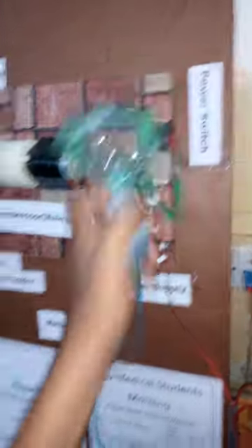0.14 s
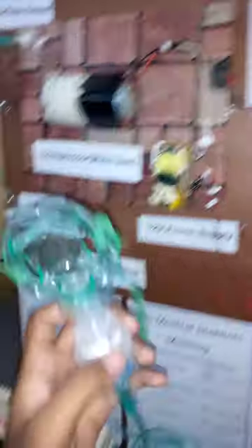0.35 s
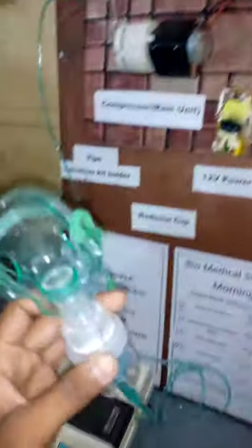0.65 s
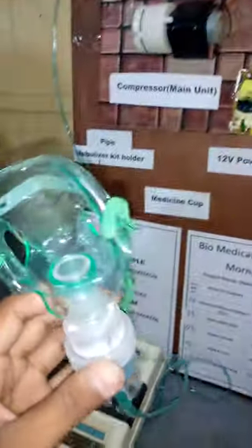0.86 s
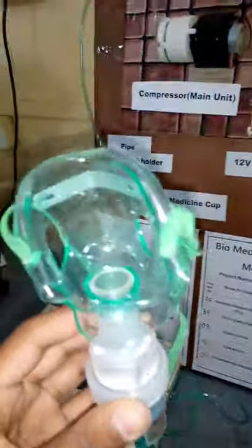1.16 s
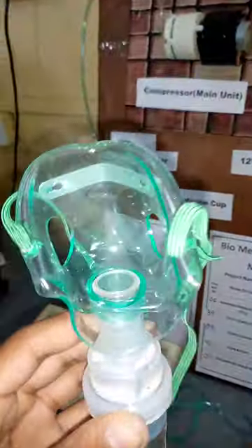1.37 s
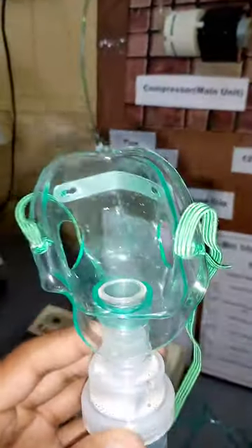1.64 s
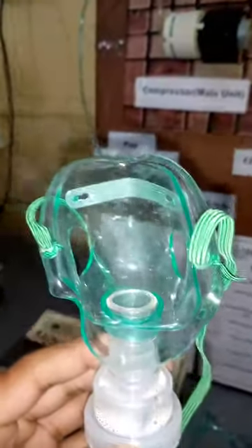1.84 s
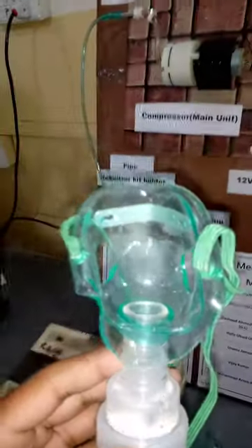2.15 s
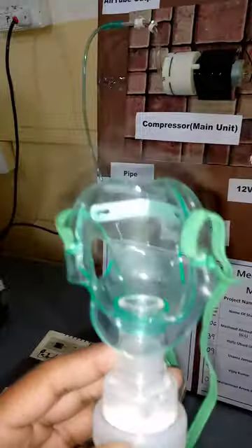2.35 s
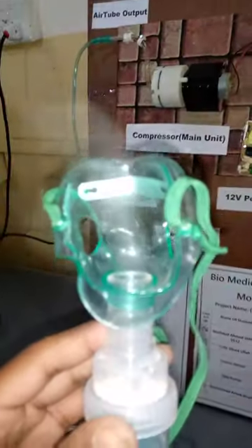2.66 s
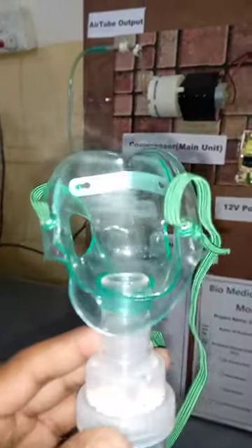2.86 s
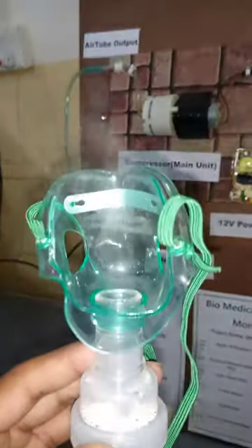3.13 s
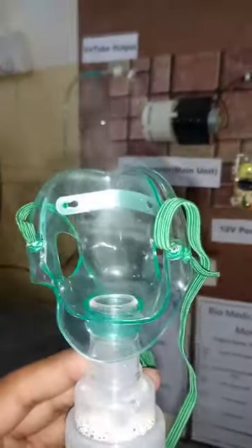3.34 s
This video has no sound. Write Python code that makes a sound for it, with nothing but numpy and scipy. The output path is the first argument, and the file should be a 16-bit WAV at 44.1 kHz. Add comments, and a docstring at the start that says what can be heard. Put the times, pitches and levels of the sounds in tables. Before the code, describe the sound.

A small compressor motor buzzes low with rushing air while a handheld nebuliser jet hisses and fizzes up close; crackling liquid bursts crowd the first second, then thin out in a small, dry room.

```python
"""A medical nebuliser hisses as its mask is brought close to the microphone, driven by a diaphragm compressor.
The jet is noise through the resonances of the cup, under a high whistle and a fizz of droplets. Each slug of
liquid pulls a noise band down in a short squelch, often while the cup is swung about and seldom once it is
held still; spits chirp upward. The motor picks up speed: sines hum on its multiples over a rush of air."""
import sys
import numpy as np
from scipy import signal
from scipy.fft import rfft, irfft
from scipy.io import wavfile
from scipy.ndimage import map_coordinates

SR = 44100
rng = np.random.default_rng(int(sys.argv[2]) if len(sys.argv) > 2 else 0)


def waveform_to_disk(signal):
    """Save audio, clipped to [-1, 1], as 16-bit WAV at the path in sys.argv[1]."""
    frames = np.transpose(np.atleast_2d(signal))
    scaled = np.clip(frames, -1, 1) * 32767
    samples = np.round(scaled).astype(np.int16)
    wavfile.write(sys.argv[1], SR, samples)


N = 154350
T = np.arange(N) / SR


def from_db(db):
    """Decibels to amplitude gain."""
    return 10 ** (np.asarray(db) / 20)


def rms_one(x):
    """Scale to rms 1."""
    return x / np.sqrt(np.mean(x ** 2) + 1e-20)


def in_time(rows):
    """Each column of a curve, sample by sample."""
    t, *columns = np.transpose(rows)
    return [np.interp(T, t, column) for column in columns]


def drift(rate_hz):
    """Smooth random movement of rms 1: noise low-passed by two equal poles at rate_hz."""
    step = 20  # samples between computed points
    pole = np.exp(-2 * np.pi * rate_hz * step / SR)
    noise = rng.standard_normal(N // step + 2002)
    slow = signal.lfilter([1], [1, -2 * pole, pole * pole], noise)[2000:]  # drop the settling time
    return np.interp(np.arange(N) / step, np.arange(len(slow)), rms_one(slow))


def coloured_noise(spectrum):
    """Noise of rms 1, shaped by a spectrum drawn over log frequency."""
    hz, db = np.transpose(spectrum)
    bins_hz = np.fft.rfftfreq(N, 1 / SR)
    gain = from_db(np.interp(np.log(bins_hz + 1), np.log(hz), db))
    return rms_one(irfft(rfft(rng.standard_normal(N)) * gain, N))


def resonate(x, hz, width_hz):
    """One two-pole resonance, gain about 1 at its peak."""
    r = np.exp(-np.pi * width_hz / SR)
    zeros = np.array([1, 0, -1]) * (1 - r * r) / 2
    poles = [1, -2 * r * np.cos(2 * np.pi * hz / SR), r * r]
    return signal.lfilter(zeros, poles, x + 1e-18)


def noise_band(hz, width_hz):
    """Noise passed twice through a resonance, for steep skirts."""
    once = resonate(rng.standard_normal(N), hz, width_hz)
    return resonate(once, hz, width_hz)


def gliding_noise(hz, width_hz, evenness=0):
    """A narrow noise band carried on a moving pitch, rms 1; evenness 1 holds its envelope steady."""
    lowpass = signal.butter(2, width_hz / 2, fs=SR, output="sos")
    i, q = signal.sosfilt(lowpass, rng.standard_normal((2, N)))
    phase = 2 * np.pi * np.cumsum(hz) / SR
    band = i * np.cos(phase) + q * np.sin(phase)
    return rms_one(band / np.hypot(i, q) ** np.clip(evenness, 0, 1))


# speed of the motor: t/s, f/Hz (turns per second)
MOTOR_SPEED = [(0.0, 33.5), (0.09, 33.6), (0.27, 35.0), (0.48, 35.9), (0.78, 36.4), (0.98, 36.4),
               (1.57, 36.9), (1.92, 37.1), (2.26, 36.9), (2.88, 37.0), (3.14, 36.5), (3.5, 36.7)]


def shaft_angle():
    """The turning shaft's angle in radians, its speed summed over time."""
    speed_hz, = in_time(MOTOR_SPEED)
    return 2 * np.pi * np.cumsum(speed_hz) / SR


# pump hum lines: multiple of the shaft speed, then mean level/dB at each of four listening places
HUM_LINES = [(5, -56, -61.5, -62, -65), (8, -57, -68, -63, -62), (9, -73, -65.5, -60, -60),
             (10, -56, -62, -69, -77), (11, -74, -78, -69.5, -67), (15, -62, -64, -57, -59.5),
             (16, -59, -70, -61.5, -66), (18, -86, -72, -59.5, -59.5), (20, -53, -65, -89, -74),
             (21, -57, -65.5, -77, -71), (22, -65, -60.5, -66, -64), (25, -62, -64, -66, -62),
             (26, -79, -69, -65, -64)]
# strongest hum line: t/s, mean level/dB
MAIN_HUM_LEVEL = [(0, -56), (.2, -54.5), (.45, -50.5), (1.3, -52), (1.9, -54.5), (2.95, -54.5),
                  (3.15, -50.5), (3.5, -52)]
# where the microphone is, between those places: t/s, place (0-3)
MICROPHONE_PLACE = [(0.1, 0), (.5, 1), (.85, 1.05), (1.4, 2), (2.88, 2), (3.1, 3)]


def pump_hum(angle):
    """Sines locked to multiples of the shaft speed, each wavering slightly in level."""
    main_order, waver_db, waver_hz = 6, 0.2, 2.2
    place, = in_time(MICROPHONE_PLACE)
    lines = [(main_order, in_time(MAIN_HUM_LEVEL)[0])]
    for order, *place_db in HUM_LINES:
        lines.append((round(order), np.interp(place, np.arange(len(place_db)), place_db)))
    hum = np.zeros(N)
    for order, db in lines:
        gain = from_db(db + waver_db * drift(waver_hz))
        hum += gain * np.sin(order * angle + 2 * np.pi * rng.random())
    return np.sqrt(2) * hum  # line levels are rms


# colour of the rush of pump and air: f/Hz, relative level/dB (per Hz)
RUSH_SPECTRUM = [(25, -35), (36, -38), (47, -7.5), (60, -28), (80, 2), (105, -7), (150, -1), (205, -2),
                 (250, -6.5), (310, -1), (450, -3.5), (700, -6.5), (1000, -9.5), (1300, -8.5), (2050, -17),
                 (2500, -11.5), (3050, -7.5), (3500, -14.5), (4300, -19), (6000, -12.5), (16000, -33.5)]


def air_rush(angle):
    """Coloured noise that swells a little on each stroke, once per turn of the shaft."""
    level_db, stroke_depth = -45.5, 0.061
    stroke = 1 + stroke_depth * np.sin(angle)
    return from_db(level_db) * coloured_noise(RUSH_SPECTRUM) * stroke


def compressor():
    """One shaft drives both the pump's hum lines and the pulsing rush of air."""
    angle = shaft_angle()
    return pump_hum(angle) + air_rush(angle)


# resonances of cup and mask: f/Hz, width/Hz (of one pass), relative level/dB (gain at the peak)
CUP_RESONANCES = [(3415, 760, -14.5), (5284, 273, 1.5), (5825, 224, 2), (6580, 730, -8), (7600, 710, -6.5),
                  (8600, 920, -15), (10100, 705, -7)]


def cup_hiss(slide):
    """Noise in the cup's resonances, read at a varying speed so that its colour slides; rms 1."""
    hiss = sum(from_db(db) * noise_band(hz, width) for hz, width, db in CUP_RESONANCES)
    return rms_one(map_coordinates(hiss, [np.cumsum(slide)], order=5, mode="mirror"))


def in_cup(x):
    """Part of a sound rings in the cup, the rest escapes directly."""
    share = 0.84
    rung = sum(from_db(db) * resonate(x, hz, width) for hz, width, db in CUP_RESONANCES)
    return (1 - share) * x + share * rung


# the hiss changes colour a little as the mask is turned: t/s, frequency ratio
COLOUR_SLIDE = [(0, .988), (.3, .995), (.6, 1), (1.2, 1.01), (1.8, 1.005), (2.3, .998), (3.5, .99)]


def colour_slide():
    """Frequency ratio of the hiss and whistle, with a small random wander."""
    wander, wander_hz = 0.003, 4
    return in_time(COLOUR_SLIDE)[0] + wander * drift(wander_hz)


def top_whistle(slide):
    """A narrow noise band high above the hiss, its pitch wandering and its level fluttering."""
    centre_hz, width_hz = 14850, 900
    wander_hz, wander_rate_hz = 170, 25
    flutter_db, flutter_hz = 1.8, 38
    pitch_hz = centre_hz * slide + wander_hz * drift(wander_rate_hz)
    return gliding_noise(pitch_hz, width_hz) * from_db(flutter_db * drift(flutter_hz))


def droplets():
    """Tiny drops of uneven size burst at random, each ringing briefly at one of 20 pitches; rms 1."""
    drops_per_s, spread_db, low_hz, high_hz = 1400, 3.5, 5100, 10600
    sizes = from_db(spread_db * np.minimum(rng.exponential(1, N), 4)) * rng.choice([-1, 1], N)
    clicks = sizes * (rng.random(N) < drops_per_s / SR)
    pitches_hz = np.geomspace(low_hz, high_hz, 20)
    dealt = rng.integers(0, len(pitches_hz), N)  # which pitch each drop gets
    ringing = np.zeros(N)
    for k, hz in enumerate(pitches_hz):
        ring = resonate(clicks * (dealt == k), hz, hz / 15)
        ringing += resonate(ring, hz, hz / 4)  # softens the onset
    return rms_one(ringing)


# slugs of liquid pass the jet:
# loudest moment t/s, rise t/s, fall t/s, pitch it falls toward f/Hz, level/dB before the cup
LIQUID_SLUGS = [(0.062, 0.0071, 0.0086, 5600, -32.5), (.145, .04, 0.068, 10000, -39.5),
                (0.234, 0.022, .014, 6910, -28), (.264, .009, 0.0048, 5500, -29),
                (0.277, 0.0085, .006, 3200, -42), (.325, 0.0057, 0.0076, 5950, -25.5),
                (0.354, 0.01, 0.017, 5430, -27), (0.384, .006, .014, 5400, -30),
                (0.414, 0.0078, 0.012, 5400, -29), (.488, .013, .008, 7600, -24.5),
                (.502, .006, 0.018, 6910, -28.5), (0.527, 0.0064, .013, 5900, -23.5),
                (0.588, 0.0045, 0.012, 8000, -24.5), (0.619, 0.0098, 0.023, 5450, -24.5),
                (0.731, 0.0067, .014, 5120, -25.5), (0.783, 0.0071, 0.0068, 7000, -25.5),
                (.820, 0.007, 0.0083, 6700, -24.5), (1.024, 0.0044, 0.0059, 8600, -27),
                (1.054, 0.0063, 0.023, 4730, -29), (1.185, 0.013, 0.021, 4890, -27.5),
                (1.275, .01, 0.0099, 5310, -28), (1.323, 0.01234, 0.0098, 6300, -24.5),
                (1.435, 0.0067, .01, 9830, -27.5), (1.468, 0.017, .012, 5310, -27),
                (1.623, .003, .013, 5100, -25), (1.667, 0.012, 0.013, 5280, -26.5),
                (1.766, 0.014, 0.027, 5440, -27.5), (2.155, 0.0131, 0.012, 6030, -27),
                (2.2, 0.012, 0.0058, 6570, -26.5), (2.648, .013, 0.0097, 6420, -30.5),
                (2.901, .012, .009, 9280, -33), (2.917, .007, 0.0051, 6430, -31),
                (3.05, .015, 0.014, 6020, -32.5)]


def squelches():
    """Slugs sweep a rough noise band downward; also returns their gain and the jet's choking (0-1)."""
    top_hz, fall_rate = 11570, 3.8  # fall_rate: time constants per slug
    swell_db, fade_db = 13, 13
    wobble_hz, wobble_rate_hz, rough_db, rough_hz = 330, 170, 2, 220
    pitch_hz, gain, choked = np.full(N, float(top_hz)), np.zeros(N), np.zeros(N)
    for peak, rise, fall, low_hz, db in LIQUID_SLUGS:
        span = (T > peak - rise) & (T < peak + fall)
        t = T[span] - peak
        progress = (t + rise) / (rise + fall)
        fill = np.minimum(4 * np.sin(np.pi * progress), 1)  # soft edges
        pitch_hz[span] = low_hz + (top_hz - low_hz) * np.exp(-fall_rate * progress)
        contour_db = np.minimum(swell_db * t / rise, -fade_db * t / fall)
        gain[span] += fill * from_db(db + contour_db)
        choked[span] = np.maximum(choked[span], fill)
    wobbling_hz = pitch_hz + wobble_hz * drift(wobble_rate_hz)
    sweep = gliding_noise(wobbling_hz, width_hz=1250, evenness=0.45)
    rough = from_db(rough_db * drift(rough_hz))
    window = np.hanning(int(0.004 * SR) + 3)  # about 4 ms of smoothing
    choked = signal.fftconvolve(choked, window / window.sum(), "same")
    return in_cup(sweep * gain * rough), gain, choked


# the jet clears with a spit: loudest moment t/s, pitch at that moment f/Hz, level/dB
JET_SPITS = [(0.286, 5186, -31), (0.371, 7600, -37), (.403, 7400, -30), (0.424, 7000, -38),
             (.561, 7700, -35), (.640, 6600, -35), (0.779, 7800, -35), (1.077, 6500, -32),
             (1.207, 7000, -37), (1.288, 7000, -34), (1.483, 9000, -33), (1.599, 5700, -33.5),
             (1.637, 5600, -30), (1.681, 7000, -32.5)]


def spits():
    """The jet clears with a sharp chirp whose pitch shoots up and levels off."""
    attack_s, decay_s, rise_hz_per_s = 0.0016, 0.0035, 170000
    pitch_hz, gain = np.zeros(N), np.zeros(N)
    for peak, hz, db in JET_SPITS:
        span = (T > peak - 3 * attack_s) & (T < peak + 4 * decay_s)
        t = T[span] - peak
        pitch_hz[span] = hz + rise_hz_per_s * decay_s * np.tanh(t / decay_s)
        fade = np.where(t < 0, (t / attack_s) ** 2, t / decay_s)
        gain[span] = from_db(db) * np.exp(-fade)
    return gain * gliding_noise(pitch_hz, width_hz=450, evenness=0.9)


# the mouth of the mask rings while it faces the microphone: t/s, boost level/dB
MASK_FACING = [(0, 1.5), (.33, 4.5), (.48, 11.5), (.62, 11.5), (.8, 11), (.95, 2), (3.5, 6)]


def mask_mouth(jet):
    """A resonance of the mask's mouth, added to the jet by as much as the mask faces the microphone."""
    boost = from_db(in_time(MASK_FACING)[0]) - 1
    return jet + boost * resonate(jet, 7560, width_hz=520)


# the jet before choking and the mask's ring: t/s, hiss level/dB, top whistle level/dB
JET_LEVELS = [(0, -44, -66), (.08, -45, -62), (.13, -41.5, -37), (.22, -40, -49), (.3, -40.5, -42),
              (.45, -36.5, -43.5), (.62, -36.5, -41.5), (.85, -38.5, -41.5), (1.15, -38, -41.5),
              (1.6, -38, -43.5), (1.95, -40.5, -46.5), (2.2, -39.5, -47.5), (2.5, -44.5, -49.5),
              (3.1, -44.5, -52.5), (3.5, -44, -49)]


def nebuliser():
    """Fluttering hiss and whistle give way to each slug, among spits and droplets, all through the mask."""
    flutter_db, flutter_hz = 1.5, 7
    hiss_duck, whistle_duck = 0.42, 0.66  # share lost when fully choked
    spray_db, fizz_db = -8, -11  # droplets relative to slugs and to hiss
    hiss_db, whistle_db = in_time(JET_LEVELS)
    slugs, slug_gain, choked = squelches()
    slide = colour_slide()
    flow = from_db(hiss_db + flutter_db * drift(flutter_hz)) * (1 - hiss_duck * choked)
    hiss = flow * cup_hiss(slide)
    whistle = top_whistle(slide) * from_db(whistle_db) * (1 - whistle_duck * choked)
    spray = droplets() * (from_db(spray_db) * slug_gain + from_db(fizz_db) * flow)
    return mask_mouth(hiss + whistle + in_cup(spray) + slugs + spits())


def room(x):
    """A reflection off the board, its path swaying with the hand, then the short tail of a small room."""
    delay_s, sway_s, sway_hz, board_db = 0.0037, 0.00004, 0.4, -15
    t60_s, tail_db = 0.05, -7
    delay = delay_s + sway_s * drift(sway_hz)
    x = x + from_db(board_db) * map_coordinates(x, [(T - delay) * SR], order=5)
    tail = rng.standard_normal(SR // 2) * from_db(-60 * T[:SR // 2] / t60_s)
    tail /= np.linalg.norm(tail)
    return x + from_db(tail_db) * signal.fftconvolve(x, tail)[:N]


def scene():
    """Dry compressor and nebuliser in its room, the same in both channels."""
    mono = compressor() + room(nebuliser())
    return np.array([mono, mono])


def record(dry):
    """A steep elliptic low-pass cuts the top."""
    cutoff_hz = 15780
    lowpass = signal.ellip(12, 0.1, 80, cutoff_hz, fs=SR, output="sos")
    return signal.sosfilt(lowpass, dry)


dry = scene()
out = record(dry)
waveform_to_disk(out)
```